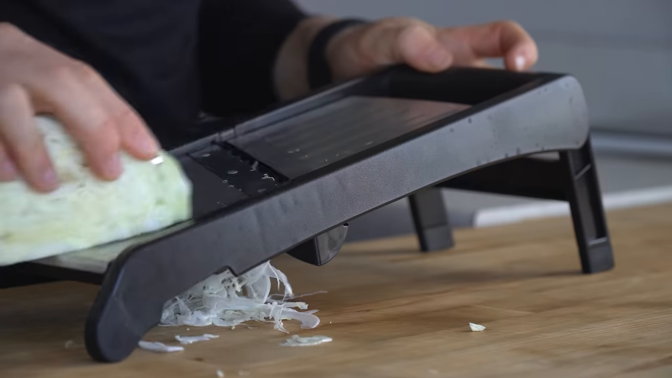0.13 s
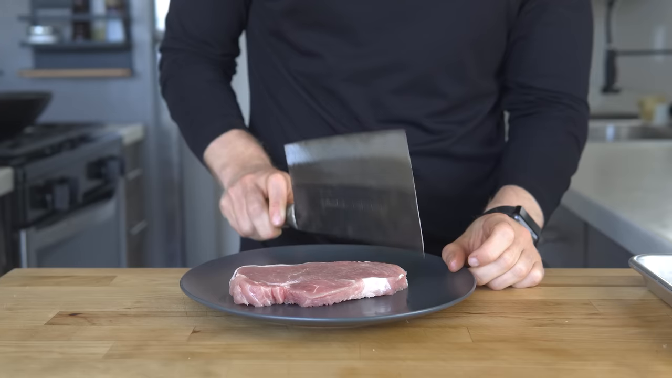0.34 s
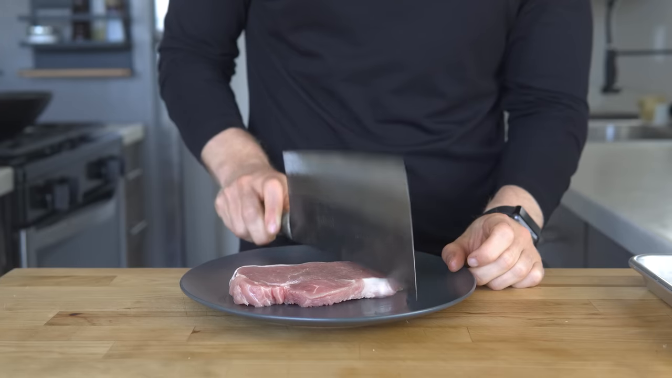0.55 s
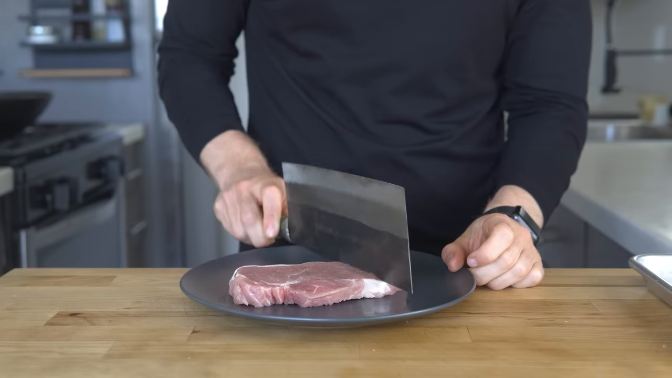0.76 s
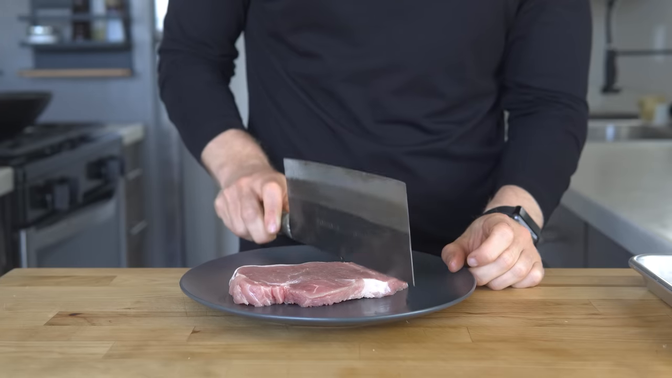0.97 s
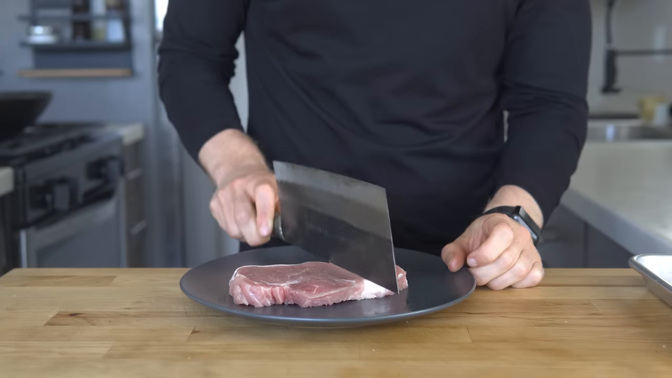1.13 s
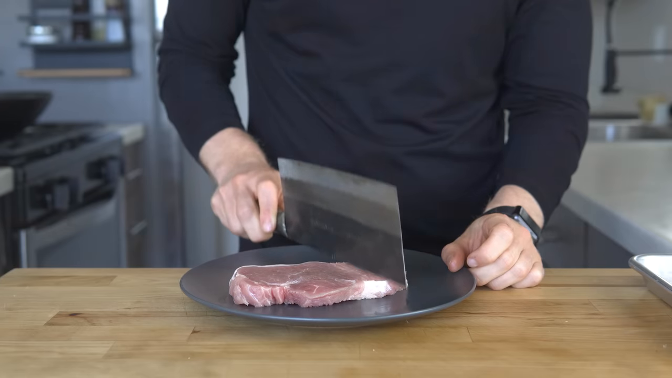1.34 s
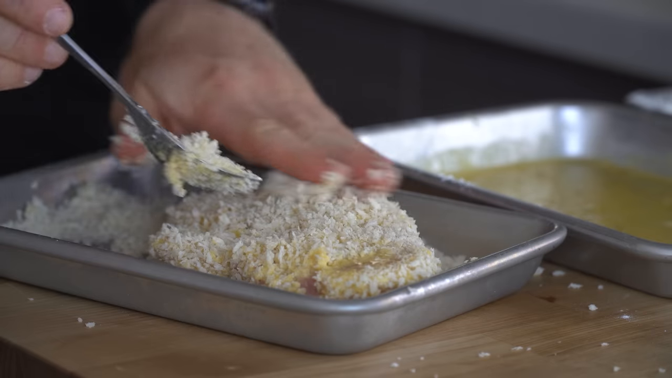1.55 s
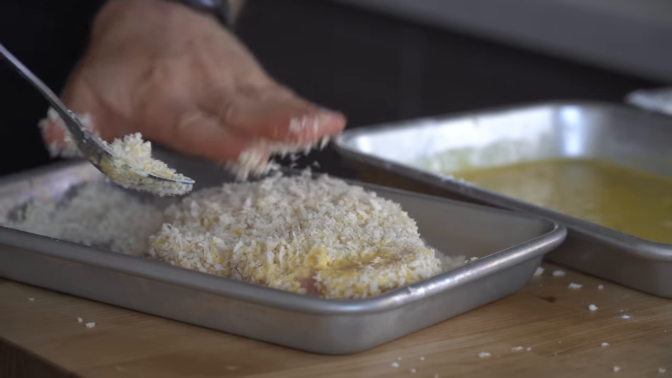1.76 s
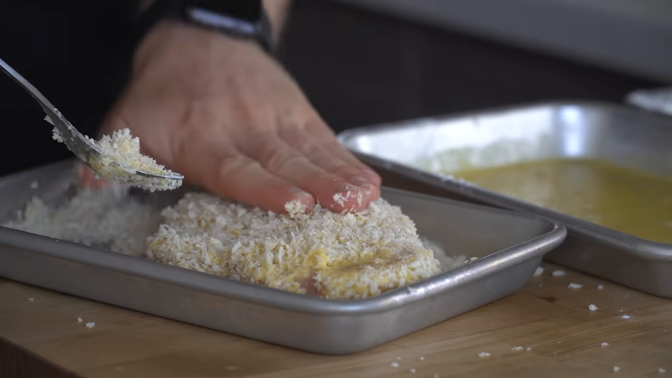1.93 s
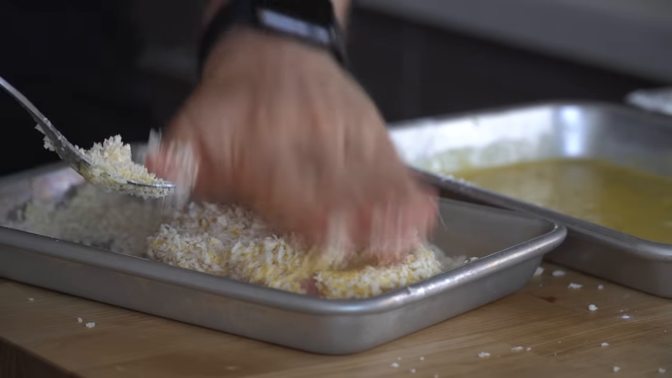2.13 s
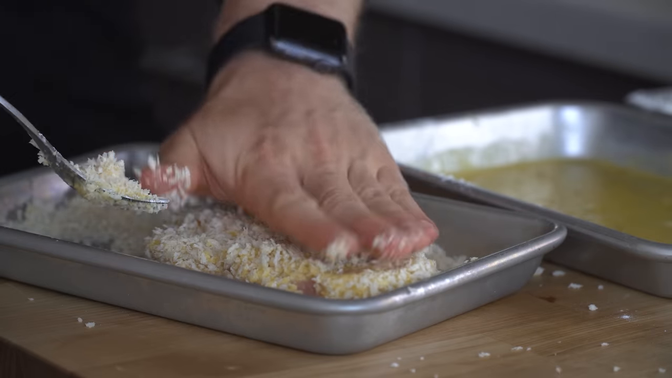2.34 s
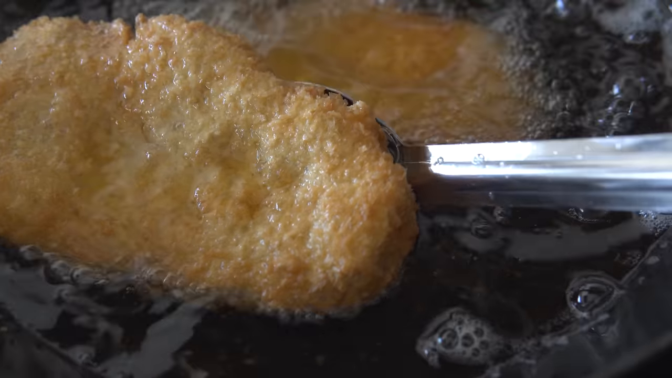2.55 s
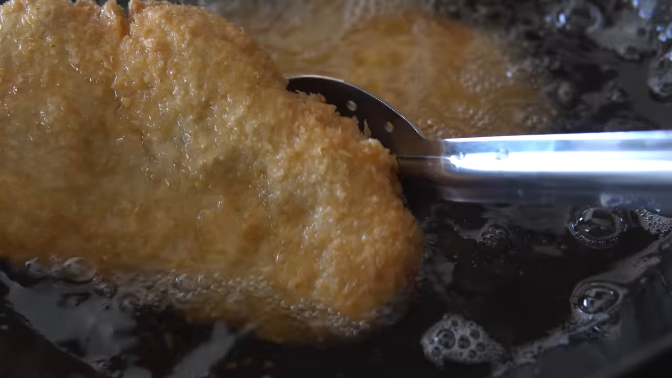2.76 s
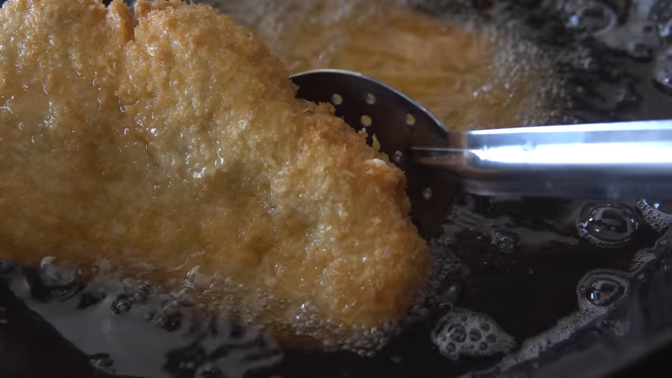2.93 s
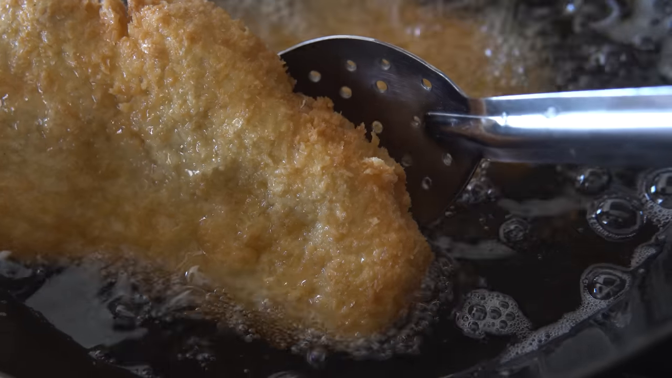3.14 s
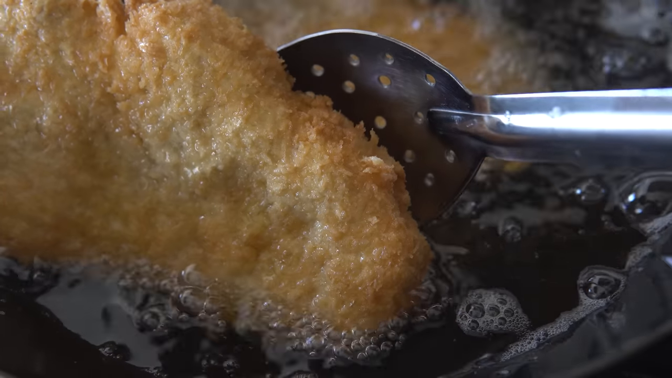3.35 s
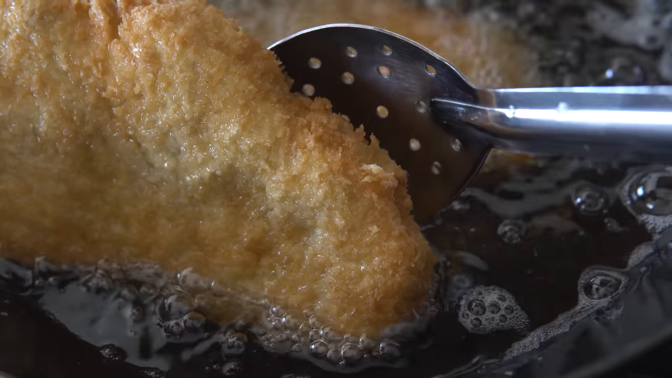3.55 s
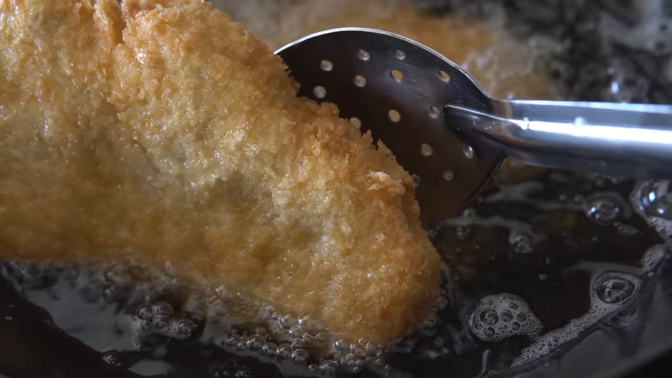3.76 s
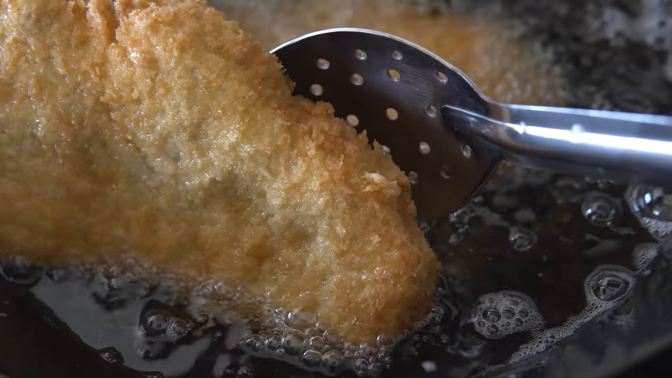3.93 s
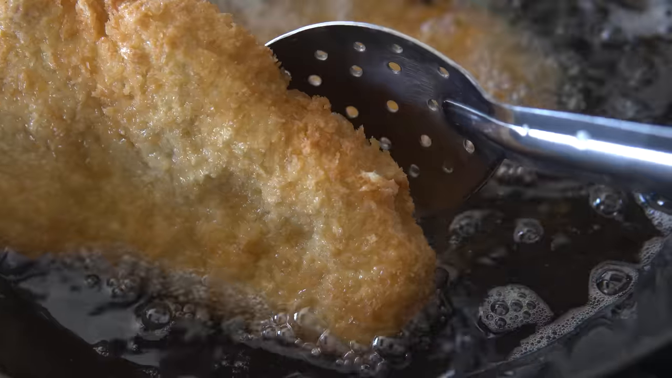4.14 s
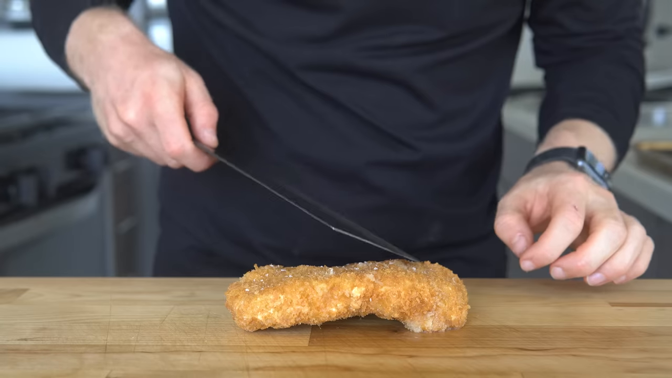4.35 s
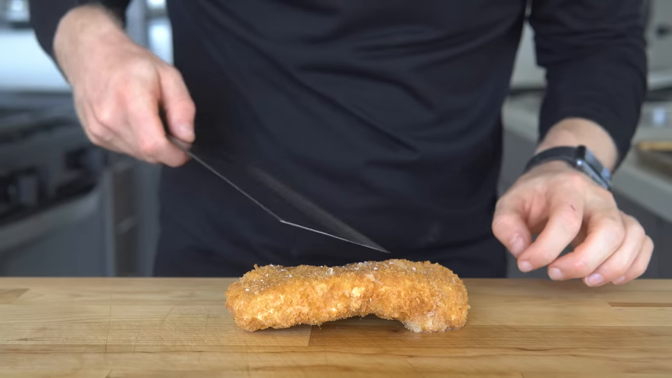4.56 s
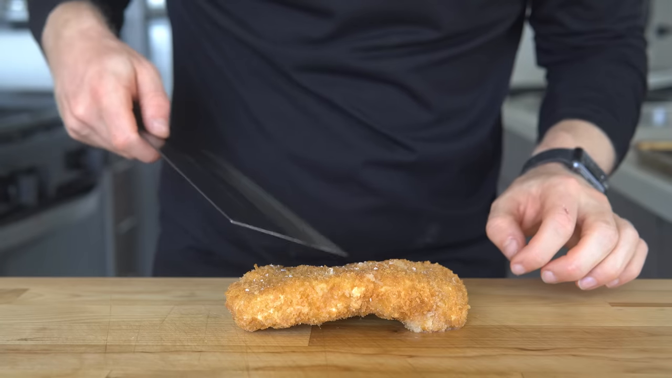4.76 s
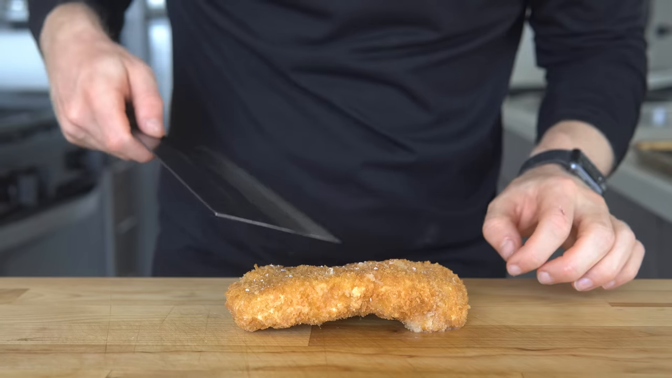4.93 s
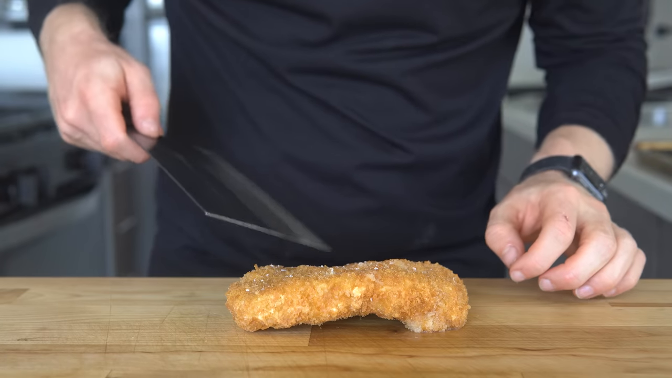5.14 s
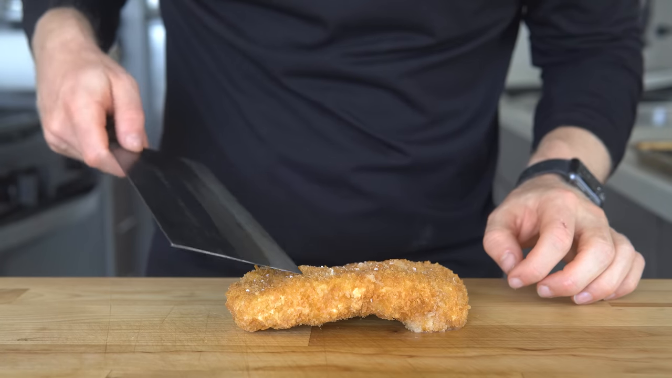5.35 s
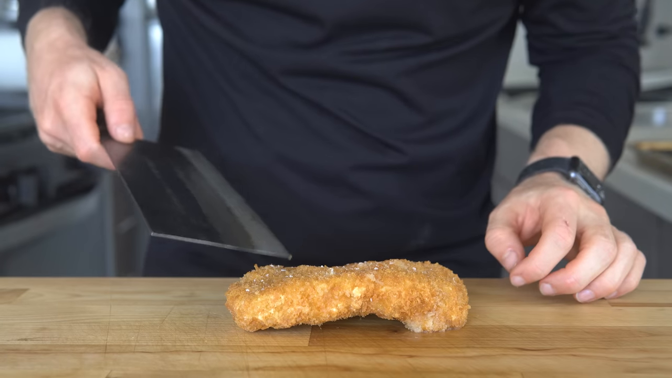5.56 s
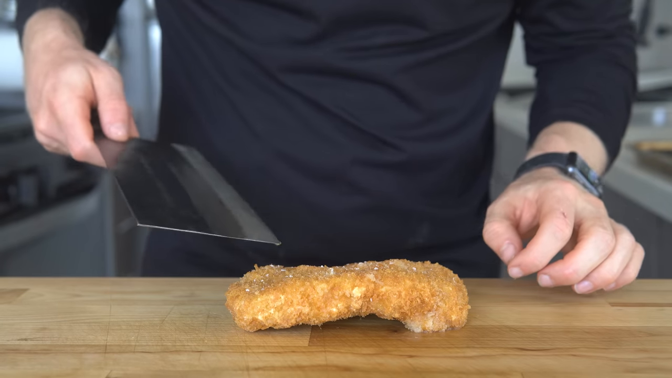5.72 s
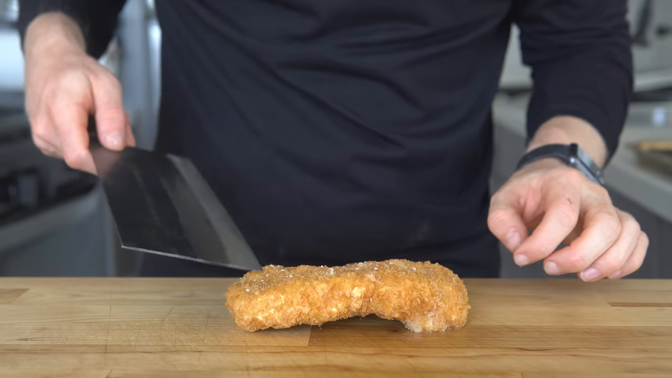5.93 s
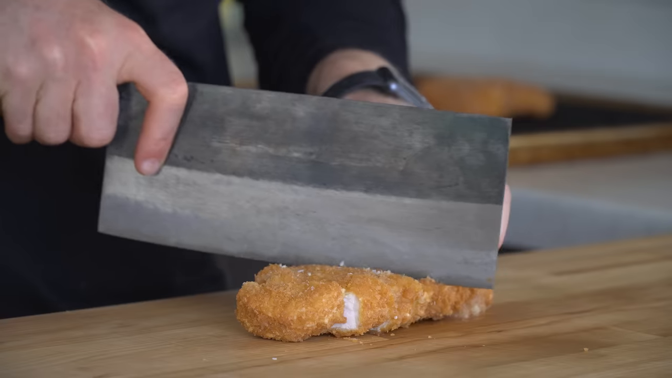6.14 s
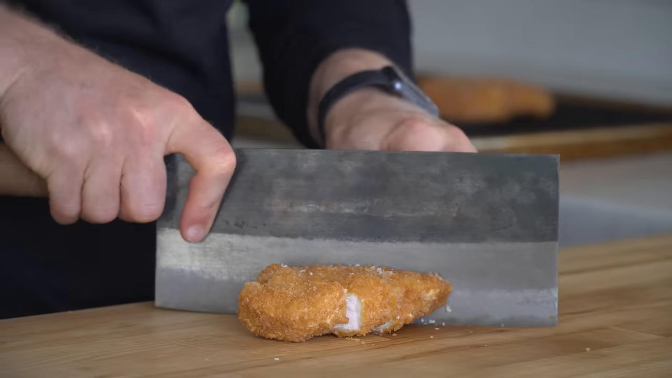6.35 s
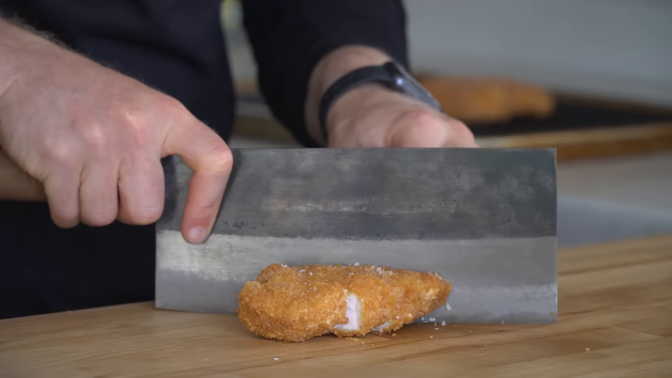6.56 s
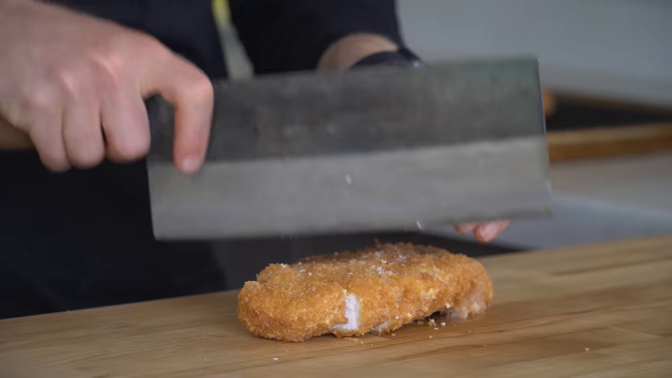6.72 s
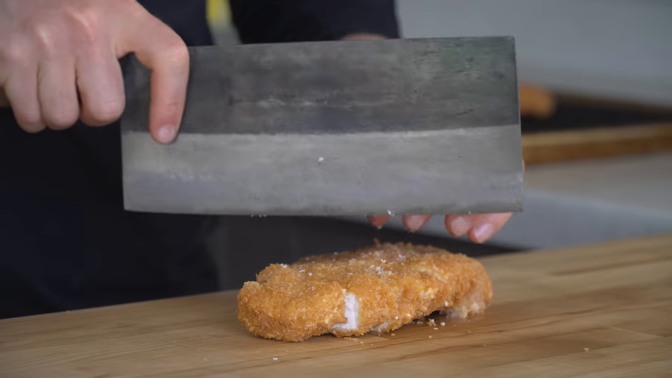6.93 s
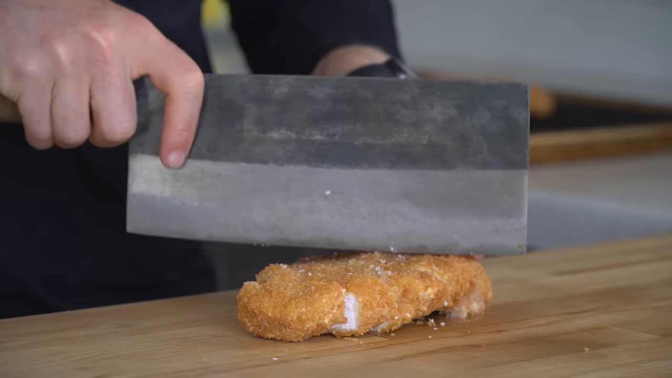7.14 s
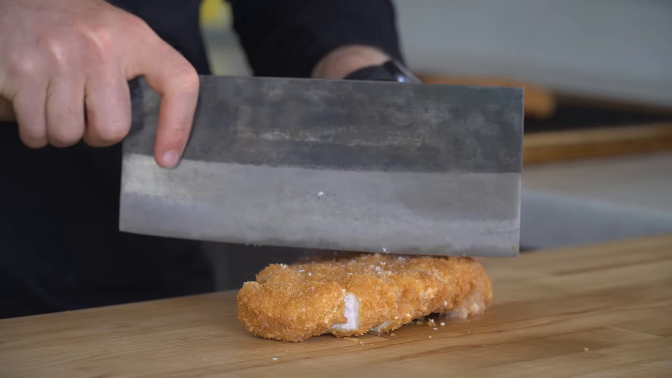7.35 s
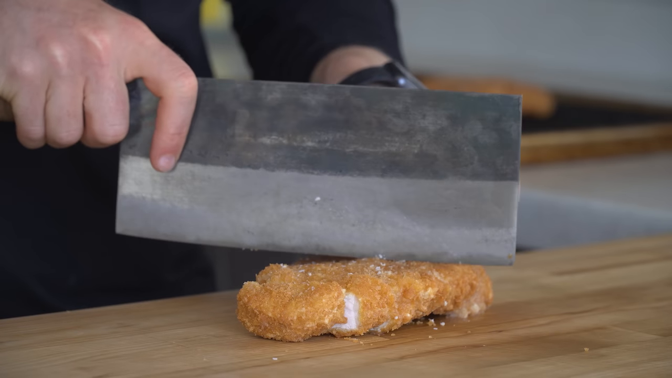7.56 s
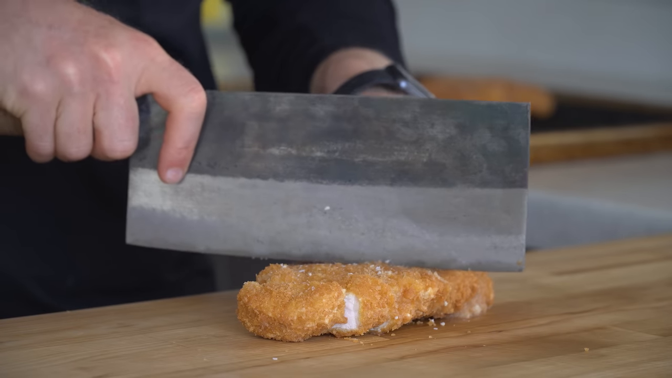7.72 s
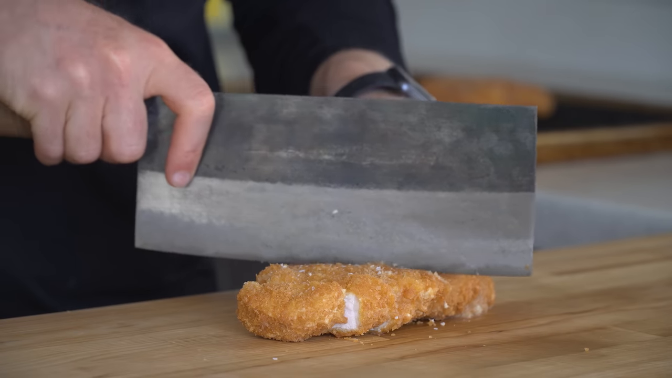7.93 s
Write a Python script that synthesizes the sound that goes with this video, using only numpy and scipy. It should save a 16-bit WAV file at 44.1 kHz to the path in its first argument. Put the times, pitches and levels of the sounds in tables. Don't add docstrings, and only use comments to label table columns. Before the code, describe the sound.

Close-miked kitchen shots in hard cuts: the tail of a crisp cabbage shred, then six wet cleaver smacks with low table thumps and a chattering plate. Quiet follows, with two soft dry crumb pats. Hot oil suddenly pops, bubbles and spits over fizz. A blade taps hard crust, its steel ringing, then crunches through, knocks and rocks on a wooden board, and finally grazes crumbs with faint metallic ticks.

```python
import sys
import numpy as np
from scipy import signal
from scipy.io import wavfile
from scipy.ndimage import uniform_filter1d

SR = 44100
rng = np.random.default_rng(int(sys.argv[2]) if len(sys.argv) > 2 else 0)


def inscribe(sig):
    pcm = np.round(np.clip(np.atleast_2d(sig).T, -1, 1) * 32767)
    wavfile.write(sys.argv[1], SR, pcm.astype(np.int16))


def ratio_of_db(decibels):
    return 10 ** (np.asarray(decibels, float) / 20)


N = 356769
TIME = np.arange(N) / SR

CUTS = [
    0.001,
    0.368,
    1.455,
    2.539,
    4.251,
    6.047,
    8.1,
]
# frequency [Hz], density [dB per Hz].
AIRS = [
    [(12, -23), (20, 1), (193, -5.5), (255, 1), (337, -7), (3740, -20.5), (16000, -40)],
    [(12, -40), (20, -31), (60, 8.5), (222, -16), (319, -11.5), (6360, -39.5), (16000, -50.5)],
    [(12, -37), (20, -3.5), (285, -6.5), (590, -13.5), (698, -11.5), (1000, -15), (16000, -45.5)],
    [(29, -40), (50, -20), (75, -14), (349, -15.5), (977, -5.5), (1910, -9.5), (2940, -10.5), (3400, -13.5),
     (4430, -7), (6650, -11), (8460, -5), (10500, -20), (13000, -8.5), (15400, -19.5)],
    [(8.8, -37), (15, 7.5), (220, -11.5), (321, -3.5), (405, -11.5), (1130, -18.5), (2200, -30),
     (9190, -29), (16000, -58)],
    [(12, -25), (20, -2.5), (277, -5), (337, -5.5), (802, -15), (1150, -17), (1530, -22), (16000, -45.5)],
]
# start [s], wet smack level [dB], smack pitch [Hz],
# thump in the meat [dB], thud in the table [dB].
BLOWS = [
    (0.4803, -44, 8000, -15.5, -14),
    (0.672, -29, 13700, -21, -14.5),
    (0.844, -27.5, 12100, -15, -12.5),
    (1.026, -36.5, 8000, -15.5, -15),
    (1.2, -37.5, 7900, -22, -21),
    (1.3906, -24, 14100, -14, -13.5),
]
BLADE_HZ = [1292, 2396, 2745, 3219, 3725, 4522, 4950, 5440, 6837, 7149, 7564, 7868, 8220, 8353, 8954, 9103,
            9330, 10040, 10800, 11700, 12560, 13650, 14680]
# level [dB], time to fall 60 dB [s].
BLADE = [(-16, 0.47), (-9, 0.19), (-27.5, .5), (-9, 0.22), (-35, 0.6), (-38, 0.71), (-20.5, 0.62),
         (-14.5, 0.453), (-17.5, 0.56), (-18, .3), (-12.5, 0.71), (-8, 0.38), (-17.5, .3), (-24, 0.52),
         (-12, 0.25), (-29, .26), (-10.5, 0.24), (-19, 0.17), (-8, 0.11), (-10.5, 0.255), (-7, 0.1),
         (-13.5, 0.166), (-13, 0.21)]


def evened(x):
    return x / np.sqrt(np.mean(x ** 2) + 1e-20)


def read(points, hz):
    f, value = np.transpose(points)
    return np.interp(np.log(hz + 1), np.log(f + 1), value)


def during(t0, t1):
    return np.clip(np.minimum(TIME - t0, t1 - TIME) * 1000, 0, 1)


def add(mix, s, sound):
    part = mix[round(s * SR):][:len(sound)]
    part += sound[:len(part)]


def colour(x, points):
    gain_db = read(points, abs(np.fft.fftfreq(16384, 1 / SR)))
    log_gain = np.log(ratio_of_db(np.maximum(gain_db, -100)))
    taps = np.fft.ifft(np.exp(np.conj(signal.hilbert(log_gain)))).real[:8192]
    return signal.oaconvolve(x, taps / np.linalg.norm(taps))[:len(x)]


def resonate(x, hz, width):
    pole = np.exp((2j * np.pi * hz - np.pi * width) / SR)
    return 2 * signal.lfilter([1 - abs(pole)], [1, -pole], x).real


def body(x, modes):
    return sum((-1) ** k * ratio_of_db(db) * resonate(x, hz, width) for k, (hz, width, db) in enumerate(modes))


def grains(per_s, spread_db, size=N):
    draw = rng.random((size, 3))
    height = ratio_of_db(spread_db * np.minimum(-np.log(draw[:, 0] + 1e-9), 5))
    sign = np.sign(draw[:, 1] - .5)
    return evened(height * sign * (draw[:, 2] < per_s / SR))


def kitchen(x, wet_db):
    # frequency [Hz], time to fall 60 dB [s].
    room_t60 = [(200, 0.59), (1000, 0.49), (4000, 0.27), (9000, 0.25), (16000, 0.039)]
    hz, t, z = signal.stft(rng.standard_normal(SR), SR, nperseg=256)
    decay = ratio_of_db(-60 * t / read(room_t60, hz)[:, None])
    tail = signal.istft(z * decay, SR, nperseg=256)[1]
    tail *= np.clip(np.arange(len(tail)) / SR / 0.00087 - 1, 0, 1)
    return x + ratio_of_db(wet_db) * signal.oaconvolve(x, tail / np.linalg.norm(tail))[:len(x)]


def air():
    airs_db = [-46, -41, -50, -40, -51.5, -51.5]
    # from [s], to [s], pitch [Hz], level [dB], wander width [Hz].
    hums = [(4.249, 6.045, 315.6, -50.5, 0.65), (4.249, 6.045, 355, -63, 2),
            (4.249, 6.045, 335.2, -59, 1.5), (4.249, 6.045, 413.5, -69, 4), (4.249, 8.1, 118, -64, 4.8),
            (4.249, 6.045, 236.5, -66, 0.67), (2.4, 8.1, 1125, -63.5, 1.2), (4.249, 5.4, 42, -53.5, 11),
            (2.26, 2.54, 295, -58, 5.9), (4.249, 6.045, 296, -67, 2)]
    swell = evened(uniform_filter1d(rng.standard_normal(N), 3000))
    beds = np.zeros(N)
    for tone, db, t0, t1 in zip(AIRS, airs_db, CUTS, CUTS[1:]):
        beds += ratio_of_db(db) * colour(rng.standard_normal(N), tone) * during(t0, t1)
    hum = np.zeros(N)
    for t0, t1, hz, db, wander in hums:
        wandering = evened(resonate(rng.standard_normal(N), hz, wander))
        line = evened(np.sin(2 * np.pi * hz * TIME) + wander / 8 * wandering)
        hum += ratio_of_db(db) * during(t0, t1) * line

    rumble_band = signal.butter(4, [10, 17], "band", fs=SR, output="sos")
    draught = signal.sosfilt(rumble_band, rng.standard_normal(N + SR))[SR:]
    draught /= np.sqrt(uniform_filter1d(draught ** 2, size=11000))
    gust_db = -34.5 + 1 * np.cos(2 * np.pi * (TIME - 3.11) / .44)
    return ratio_of_db(1.8 * swell) * beds + hum + ratio_of_db(gust_db) * draught * during(*CUTS[3:5])


def strokes(rows, shape, dull):
    s, db, rise, fall, treble_db = np.transpose(rows)[:, :, None]
    fall_db = 20 * (np.maximum(TIME - s, 0) / fall) ** shape
    level_db = db - 20 * np.maximum(s - TIME, 0) / rise - fall_db
    return ratio_of_db(level_db).sum(0), ratio_of_db(level_db + treble_db - dull * fall_db).sum(0)


def crackle(gains, tone, per_s, spread_db, wet_db):
    clumps = evened(uniform_filter1d(rng.standard_normal(N), 300))
    clumped = grains(per_s, spread_db) * ratio_of_db(1.5 * clumps)
    sound = kitchen(colour(clumped, tone), wet_db)
    high = signal.sosfilt(signal.butter(2, 5000, "high", fs=SR, output="sos"), sound)
    low = signal.sosfilt(signal.butter(2, 5000, "low", fs=SR, output="sos"), sound)
    return gains[0] * evened(low) - gains[1] * evened(high)


def shredding():
    # peak [s], level [dB], 20 dB rise [s], 20 dB fall [s], treble share [dB].
    shreds = [
        (0.045, -34.5, 1, 0.13, -7),
    ]
    # frequency [Hz], density [dB per Hz].
    shred_tone = [(300, -50), (600, -6), (1400, -1.5), (3000, -4.5), (4900, -4), (8000, -7), (16000, -18)]
    gains = strokes(shreds, shape=0.99, dull=0.22)
    return crackle(gains, shred_tone, per_s=6100, spread_db=1.5, wet_db=-12.0) * during(*CUTS[:2])


def snaps():
    # start [s], peak [dB], centre [Hz].
    single_snaps = [(0.2244, -28, 3520), (0.288, -34.5, 5060), (0.3675, -34.5, 4160), (1.7727, -34.5, 6000),
                    (6.3003, -30.5, 4080), (6.327, -21.5, 3540), (6.7205, -26.5, 5700),
                    (7.5281, -33.5, 2570), (7.596, -32, 2800), (7.7456, -32, 2900), (7.586, -32, 9700),
                    (7.715, -34, 10100), (7.7574, -27, 3200), (7.966, -37, 5300), (7.328, -40, 2500),
                    (7.682, -39, 2800), (7.837, -35, 8000), (7.93, -39, 10500), (8.029, -33.5, 1900)]
    out, t = np.zeros(N), np.arange(600) / SR
    smacks = [blow[:3] for blow in BLOWS]
    for s, db, hz in single_snaps + smacks:
        burst = rng.standard_normal(600) * np.exp(-t / 0.0014)
        burst = 0.08 * np.diff(burst, prepend=0) + 9.0 * resonate(burst, hz, width=.5 * hz)
        add(out, s, ratio_of_db(db) * burst / abs(burst).max())
    return kitchen(out, wet_db=-6)


def pounding():
    # start [s], peak [dB], lean to the upper modes [dB].
    knocks = [(0.371, -11, -2), (0.393, -6, -2), (0.49, -3.5, -2.5), (0.503, -10.5, 1), (0.515, -2, 6),
              (0.535, -9, 1), (0.548, -9, -14), (0.568, -21, 6), (0.579, -8, -2), (0.615, -15.5, -4),
              (0.64, -24, 1), (0.683, -11.5, -1), (0.695, -14, -15), (0.705, -2, 5.5), (0.719, -12.5, 2),
              (0.755, -13, -1), (0.802, -23, -1), (0.858, -10.5, -9.5), (0.878, -4, 5), (0.901, -24, -6),
              (0.926, -16, -10), (0.965, -23, -9), (1.041, -7, -3), (1.062, -1, 3), (1.085, -11, 2.5),
              (1.114, -6, -1.5), (1.16, -15.5, -2.5), (1.396, -19, -7), (1.423, -5.5, -2)]
    # counter mode [Hz], width [Hz], level [dB].
    counter = [(293, 75, -6.5), (345.4, 38.5, 0.5), (401, 75, -4.5), (502, 115, -9), (700, 67, -1),
               (816, 122, -8), (1026, 77, -9.5), (1445, 130, -14.5), (1780, 170, -16), (2246, 98, -21.5),
               (2930, 120, -31.5)]
    plate, rim_clicks, t = np.zeros(N), np.zeros(N), np.arange(12000) / SR
    for s, db, lean_db in knocks:
        chatter = ratio_of_db(5.5 - 60 * t / 0.11) * (1 - np.exp(-t / 0.0031))
        chatter *= grains(per_s=420, spread_db=3.0, size=12000)
        chatter[170:200] += ratio_of_db(6.5) * np.hanning(30)
        spot_db = 1.7 * rng.standard_normal(len(counter))
        modes = [(hz, width, mode_db + more_db) for (hz, width, mode_db), more_db in zip(counter, spot_db)]
        bright = ratio_of_db(4.0) * chatter * np.exp(-t / 0.022)
        rim = ratio_of_db(-29) * resonate(resonate(chatter, hz=3030, width=130), hz=2980, width=390)
        lower = body(chatter, modes[:4])
        upper = body(chatter, modes[4:7]) - body(bright, modes[7:]) + rim
        add(plate, s - .004, ratio_of_db(db - lean_db / 2) * lower + ratio_of_db(db + lean_db / 2) * upper)
        click = rng.standard_normal(12000) * np.exp(-t / 0.0024)
        add(rim_clicks, s, ratio_of_db(db + lean_db / 2 - 22) * click)
    rim_clicks = ratio_of_db(5.5) * resonate(resonate(rim_clicks, hz=2580, width=390), hz=3200, width=2300)
    return kitchen(resonate(plate, hz=1080, width=3400) + rim_clicks, wet_db=-6.5) * during(*CUTS[1:3])


def thuds():
    # start [s], peak [dB], pitch [Hz], time to fall 60 dB [s].
    soft_pushes = [
        (0.38, -30, 43, 0.32),
        (1.202, -24.5, 44.2, 0.14),
        (2.258, -31.5, 61, 0.27),
        (6.56, -25, 61, 0.23),
        (4.247, -40, 210, 0.057),
    ]
    out, t = np.zeros(N), np.arange(SR // 2) / SR
    meat = [(s, db, 126, 0.086) for s, _, _, db, _ in BLOWS]
    table = [(s + 0.0457, db, 45, 0.058) for s, _, _, _, db in BLOWS]
    for s, db, hz, t60 in soft_pushes + meat + table:
        sag = 1 + 0.034 * np.exp(-t / 0.0094)
        push = ratio_of_db(db - 60 * t / t60) * (1 - np.exp(-t / 0.0006)) * np.sin(2 * np.pi * hz * t * sag)
        add(out, s, 0.8 * push)
    return out * (1 - during(CUTS[2], 2.2))


def patting():
    # peak [s], level [dB], 20 dB rise [s], 20 dB fall [s], treble share [dB].
    pats = [
        (1.63, -70.5, 0.06, 1, 14.3),
        (1.72, -72, 0.15, 0.98, 16.7),
        (1.972, -45.5, 0.0039, 0.11, 8.4),
        (2.255, -41, 0.0088, 0.2, 3.8),
    ]
    # frequency [Hz], density [dB per Hz].
    crumb_tone = [(410, -30), (700, -1), (1210, -9), (1350, -3.5), (2770, -3.5), (7990, -12), (16000, -23)]
    gains = strokes(pats, shape=0.48, dull=1.0)
    return crackle(gains, crumb_tone, per_s=7000, spread_db=1.0, wet_db=-15.0) * during(*CUTS[2:4])


def frying():
    # start [s], peak [dB], pitch [Hz].
    bubbles = [(2.5433, -20, 4100), (2.5712, -18.5, 3200), (2.621, -19, 3630), (2.7499, -16.5, 3800),
               (2.8406, -16.5, 3580), (2.8756, -24.5, 4370), (2.9653, -22, 3960), (3.107, -14, 3530),
               (3.198, -20.5, 3760), (3.2337, -17.5, 3470), (3.3034, -22.5, 3720), (3.331, -7.5, 3600),
               (3.3531, -10, 3450), (3.3728, -7.5, 3960), (3.395, -31, 3980), (2.5967, -23, 3730),
               (2.904, -21.5, 3430), (3.2597, -25, 4150), (3.621, -17.5, 3280), (3.7586, -20.5, 4560),
               (3.941, -25, 3870), (3.949, -17.5, 3660), (4.04, -22, 4150), (4.246, -18, 4600),
               (3.434, -21.5, 3980), (3.47, -24.5, 3020), (3.5125, -10.5, 3230), (3.561, -13.5, 5530),
               (3.567, -22, 4930), (3.551, -14, 3460), (3.5915, -9.5, 3180), (3.6426, -20, 4300),
               (3.6967, -16, 3700), (3.7948, -9.5, 4760), (3.821, -10.5, 3880), (3.8835, -12, 4200),
               (3.9287, -14.5, 5060), (4.048, -12.5, 4230), (4.0677, -15.5, 3320), (4.1178, -11.5, 4050),
               (4.1402, -11, 3700), (4.1904, -15.5, 3540), (4.2235, -13.5, 4400)]
    # start [s], peak [dB], pitch [Hz].
    plops = [(2.815, -14.5, 2130), (3.143, -22, 2360), (3.416, -22, 1400), (3.511, -22, 2160),
             (3.605, -19.5, 700), (3.816, -26, 700), (3.886, -20, 2130)]
    # start [s], peak [dB].
    spit_sizes = [
        [(2.6012, -16), (2.749, -16), (2.8411, -24), (2.8746, -22), (2.9288, -16), (3.109, -21), (3.497, -17.5),
         (3.521, -22), (3.5515, -15), (3.5899, -23), (3.931, -14), (4.1013, -18.5), (4.1212, -14)],
        [(2.5524, -19), (2.9576, -19), (3.0016, -16), (3.319, -16.5), (3.695, -14.5), (3.7182, -12.5),
         (3.744, -22), (3.875, -24), (3.981, -21), (3.992, -11), (4.222, -13.5)],
    ]
    spit_hz = [6270, 8600]
    # start [s], peak [dB].
    fleck_rows = [(2.538, -21), (2.5524, -20), (2.5634, -20), (2.6012, -22.5), (2.666, -18.5),
                  (2.7107, -31.5), (2.842, -19), (2.9579, -36), (2.977, -16), (3.0008, -26), (3.0116, -19),
                  (3.111, -17), (3.301, -28), (3.4952, -21.5), (3.5755, -29), (3.693, -28), (3.7049, -22),
                  (3.7453, -31), (3.789, -17), (3.8753, -20), (3.911, -25), (3.979, -23), (4.105, -20),
                  (4.1234, -21), (4.234, -12)]
    # pan mode [Hz], width [Hz], level [dB].
    pan = [(3410, 140, 10), (4490, 810, 5.5), (6160, 560, -1.5), (8240, 250, 1.5), (13500, 5400, -18)]
    pan_air = AIRS[3][4:]
    pops, t = np.zeros(N), np.arange(2500) / SR
    spits = [(s, db, hz * rng.uniform(0.856, 1.063)) for rows, hz in zip(spit_sizes, spit_hz) for s, db in rows]
    for events, t60 in ((bubbles, .04), (spits, .02), (plops, .04)):
        fade = ratio_of_db(-25 * t / t60 - 60 * (t / t60) ** 2)
        for s, db, hz in events:
            kicks = grains(per_s=4500, spread_db=3.5, size=2500) * fade
            kicks[0] = 5.5
            bubble = resonate(resonate(kicks, hz, width=0.16 * hz), hz, width=.5 * hz)
            pop = bubble + 0.24 * body(kicks, pan)
            add(pops, s, ratio_of_db(db - 2.0) * pop / abs(pop).max())

    fizz = colour(grains(per_s=2400, spread_db=4.6), pan_air)
    small = sum(resonate(grains(per_s=65, spread_db=7.0), hz, width=0.16 * hz)
                for hz in np.geomspace(2600, 14000, num=12))
    froth = ratio_of_db(-3) * evened(fizz) + ratio_of_db(0.0) * evened(colour(small, pan_air))
    flecks = np.zeros(N)
    for s, db in fleck_rows:
        add(flecks, s, ratio_of_db(db + 5.5) * rng.standard_normal(60) * np.exp(-t[:60] / 0.00019))
    flecks = colour(np.diff(flecks, prepend=0), pan_air)
    return kitchen(pops + flecks + ratio_of_db(-42.5) * froth, wet_db=-14.5) * during(*CUTS[3:5])


def steel_modes(crowd_t60=0.44):
    t = np.arange(SR * 2 // 3) / SR
    blade_db, blade_t60 = np.transpose(BLADE)
    crowd_hz = rng.uniform(2300, 16000, size=100)
    crowd_fall = crowd_t60 * np.sqrt(8000 / np.maximum(crowd_hz, 9000))
    hz = np.append(BLADE_HZ, crowd_hz)[:, None]
    db = np.append(blade_db, np.full(100, -17))[:, None]
    t60 = np.append(blade_t60, crowd_fall)[:, None]
    sway = np.cumsum(uniform_filter1d(rng.standard_normal(len(t)), 900)) * .055 / SR
    return ratio_of_db(db - 60 * t / t60) * np.sin(2 * np.pi * hz * (t + sway)) * (1 - (t / t[-1]) ** 4)


def ring(modes):
    place = rng.standard_normal((len(modes), 2))
    sound = (ratio_of_db(2.5 * place[:, 0]) * np.sign(place[:, 1])) @ modes
    return sound / np.linalg.norm(sound)


def tapping(modes):
    # start [s], peak [dB], ring [dB], contact [s], first crack [1-30].
    taps = [(4.19, -6.5, -10, 0.0069, 4.3), (4.4239, -16.5, -12, .011, 3.3),
            (4.5811, -13, -4.5, 0.0086, 1.5), (4.5994, -21.5, -11, 0.013, 3.4),
            (4.702, -13.5, -17, 0.017, 2.3), (4.725, -21, -4.5, 0.0093, 4.2),
            (4.9685, -16.5, -25, 0.012, 5.8), (5.1078, -4, -14, 0.0081, 8.6),
            (5.421, -9.5, -21, 0.0077, 2.5), (5.4249, -5, -17, 0.011, 4.8), (5.477, -21.5, 2.5, 0.009, 3.3),
            (5.714, -16.5, -12, 0.011, 2.6), (5.7214, -10.5, -9.5, 0.012, 6.5)]
    # frequency [Hz], density [dB per Hz].
    tap_tone = [(350, -64), (600, -18), (1310, -14), (2180, -18), (2400, -10), (2910, -12), (3680, -12),
                (5120, -10.5), (9110, -6), (16000, -12)]
    # time [s], level [dB].
    sing_on = [(4.25, -54), (4.34, -59), (4.46, -61), (4.57, -81), (4.59, -50), (4.69, -60), (4.8, -66),
               (5.1, -63), (5.17, -53), (5.4, -67.5), (5.47, -59), (5.6, -77), (5.71, -66), (5.76, -45),
               (5.85, -63), (6.05, -61)]
    crack_hz = 9000
    out, t, click = np.zeros(N), np.arange(4000) / SR, signal.unit_impulse(4000)
    damped = [(hz, 257, mode_db) for hz, (mode_db, _) in zip(BLADE_HZ, BLADE)]
    next_contacts = [row[0] for row in taps[1:]] + [CUTS[5]]
    for (s, db, ring_db, contact_s, crack), after in zip(taps, next_contacts):
        press = np.exp(-t / contact_s - (t / contact_s) ** 4) * (1 - np.exp(-t / 0.0017))
        breaks = grains(per_s=10000, spread_db=4.5, size=4000) * press + crack * np.roll(click, 12)
        held = body(breaks, damped)
        breaks = colour(breaks + 0.5 * resonate(breaks, crack_hz, width=2900) + ratio_of_db(19.5) * held, tap_tone)
        breaks *= ratio_of_db(db) / abs(breaks).max()
        add(out, s, breaks)
        blow = colour(click + 0.3 * resonate(click, crack_hz, width=2500), tap_tone)
        steel = signal.fftconvolve(blow * np.linalg.norm(breaks), ring(modes))
        muted = np.clip((np.arange(len(steel)) / SR - max(after - s, .1)) / 0.01, 0, 1)
        add(out, s, ratio_of_db(ring_db - 15 * muted) * steel)
    sings = ratio_of_db(np.interp(TIME, *np.transpose(sing_on))) * np.sin(2 * np.pi * 2748 * TIME)
    return (kitchen(out, wet_db=-6.0) + sings) * during(*CUTS[4:6])


def singing():
    # start [s], level [dB], pitch [Hz], time to fall 60 dB [s].
    favoured = [(4.251, -51, 4490, 0.58), (4.25, -59, 2942, 0.9), (4.426, -48, 1640, 0.063),
                (4.426, -47, 946, 0.088), (4.441, -62, 3219, 0.4), (4.582, -40, 947, 0.064),
                (4.583, -39, 1650, 0.078), (4.584, -42.5, 1216, 0.42), (4.583, -46.5, 1330, 0.39),
                (4.582, -39, 3720, 0.12), (4.581, -35, 4500, 0.12), (4.6, -40, 5437, 0.19),
                (4.582, -37.5, 4883, 0.36), (4.703, -42, 930, .08), (4.703, -38, 4490, 0.22),
                (4.703, -50, 4312, .22), (4.702, -39, 6708, 0.29), (4.703, -38, 5650, .15),
                (4.969, -42, 940, 0.069), (5.108, -38, 935, 0.067), (5.108, -44, 4522, 0.4),
                (5.107, -52, 3219, 0.15), (5.108, -47, 4883, 0.49), (5.108, -52, 5475, .43),
                (5.108, -57, 3725, 0.14), (5.426, -51, 4460, 0.22), (5.428, -56, 2396, 0.63),
                (5.426, -35, 10800, 0.31), (5.426, -45, 7564, 0.35), (5.426, -36, 13720, .09),
                (5.721, -51, 2390, 1), (5.722, -44, 4525, 0.45), (5.722, -45, 3219, 0.26),
                (5.721, -50, 3720, .2), (5.721, -47, 5435, 0.45), (5.721, -40, 9800, 0.16),
                (5.721, -23, 11750, 0.071), (5.721, -27, 14800, 0.088), (5.72, -42, 10810, 0.13),
                (5.721, -28, 12270, 0.086), (7.272, -55.5, 4930, .45), (7.355, -54.5, 5000, 0.61),
                (7.32, -59, 8300, 0.43), (7.315, -64, 4500, 0.27), (7.375, -57, 4480, 0.34),
                (7.33, -60, 2748, 0.35), (7.362, -54, 2749, 1.1), (7.35, -59, 2390, .9),
                (7.531, -48, 2620, .06), (7.587, -56, 6900, .3), (7.587, -51, 4480, .12),
                (7.6, -59, 4060, .5), (7.59, -57, 2750, .12), (7.75, -52, 3300, .07)]
    out, t = np.zeros(N), np.arange(SR // 2) / SR
    for s, db, hz, t60 in favoured:
        blur = .012 * np.cumsum(rng.standard_normal(len(t)))
        fade = ratio_of_db(db - 60 * t / t60) * (1 - np.exp(-t / 0.00067)) * (1 - 2 * t)
        add(out, s, fade * np.sin(2 * np.pi * hz * t + blur))
    return kitchen(out, wet_db=-6.5) * (1 - during(CUTS[5], 7.1))


def cutting(modes):
    # peak [s], level [dB], 20 dB rise [s], 20 dB fall [s], treble share [dB].
    crust = [
        [(6.062, -52, 0.023, 0.37, -1.5), (6.322, -44.5, .015, 0.21, -13), (6.4, -33, 0.075, 0.15, -7.5),
         (6.71, -54.5, 0.093, 0.2, -14)],
        [(7.365, -58.5, 0.071, 0.11, 7.5), (7.535, -57, 0.012, 0.14, -2), (7.59, -58.5, 0.022, 0.11, 9.5),
         (7.715, -47, 0.0081, 0.083, -1), (7.78, -60.5, .05, 0.16, 7), (8.0, -53.5, 0.096, 0.24, -2)],
    ]
    # frequency [Hz], density [dB per Hz].
    crust_tone = [(500, -40), (900, -8), (1700, -1.5), (2400, -7.5), (3500, -3.5), (5200, -9),
                  (12500, -9.5), (16000, -12)]
    # start [s], level [dB].
    landings = [
        (6.395, -4),
        (6.4, -7.5),
        (6.411, -9),
    ]
    # board mode [Hz], width [Hz], level [dB].
    board_modes = [(350, 35, -0.5), (530, 82, -8.5), (635, 96, -7.5), (812, 97, -8.5), (1090, 140, -16),
                   (1400, 36, -25), (1580, 40, -22), (1830, 70, -32)]
    # start [s], level [dB], pitch [Hz].
    rocks = [(6.455, -25.5, 700), (6.472, -27, 684), (6.483, -26.5, 506), (6.5, -23, 350),
             (6.545, -33, 382), (6.56, -34.5, 700)]
    cut_gains = strokes(crust[0], shape=0.96, dull=0.66)
    cut = crackle(cut_gains, crust_tone, per_s=4000, spread_db=2.5, wet_db=-13) * during(*CUTS[5:])
    touch_gains = strokes(crust[1], shape=0.55, dull=0.064)
    touch = crackle(touch_gains, crust_tone, per_s=4500, spread_db=3.0, wet_db=-5)

    lifted = ratio_of_db(8.5) * resonate(cut, hz=8500, width=2170) * during(6.71, 7.0)
    brief = modes * np.exp(-TIME[:modes.shape[1]] / 0.038)
    steel = signal.oaconvolve(lifted, ring(brief))[:N]
    steel += ratio_of_db(-9.5) * signal.oaconvolve(touch, ring(modes[12:]))[:N]

    rock_db = -7.5 - 20 * (abs(TIME - 6.39) / 0.12) ** 0.82
    drive = ratio_of_db(rock_db) * grains(per_s=1100, spread_db=3.0) * during(6.395, 6.75)
    for s, db in landings:
        add(drive, s, ratio_of_db(db) * np.hanning(50))
    board, t = ratio_of_db(14.0) * body(drive, board_modes), np.arange(3000) / SR
    for s, db, hz in rocks:
        note = ratio_of_db(db - 60 * t / 0.058) * (1 - np.exp(-t / .004)) * np.sin(2 * np.pi * hz * t)
        add(board, s, note * 2)
    return cut + touch + steel + kitchen(board, wet_db=-13)


def grazing(modes):
    # start [s], ring [dB], best shaken pitch [Hz].
    ticks = [(7.3182, -42, 14680), (7.3575, -38, 10070), (7.54, -41, 10130), (7.586, -44, 8100),
             (7.713, -46, 8400)]
    out, click, t = np.zeros(N), signal.unit_impulse(2000), np.arange(modes.shape[1]) / SR
    for s, db, hz in ticks:
        blow = 0.27 * np.diff(click, prepend=0) + ratio_of_db(12) * resonate(click, hz, width=120)
        damped_ring = ring(modes[:len(BLADE)]) * np.exp(-t / 0.13)
        add(out, s, ratio_of_db(db) * signal.fftconvolve(blow / np.linalg.norm(blow), damped_ring) * 10)
    return kitchen(out, wet_db=-1.5)


def scene():
    modes = steel_modes()
    mix = air() + shredding() + snaps() + pounding() + thuds() + patting() + frying()
    mix += tapping(modes) + singing() + cutting(modes) + grazing(modes)
    return mix[None]


def top_cut(x):
    return signal.sosfilt(signal.butter(12, 17000, fs=SR, output="sos"), x)


def record(dry):
    edge = signal.firwin(201, 15900, window=("kaiser", 5), fs=SR)
    mix = signal.oaconvolve(dry, edge[None], "same")
    return top_cut(mix)


dry = scene()
out = record(dry)
inscribe(out)
```